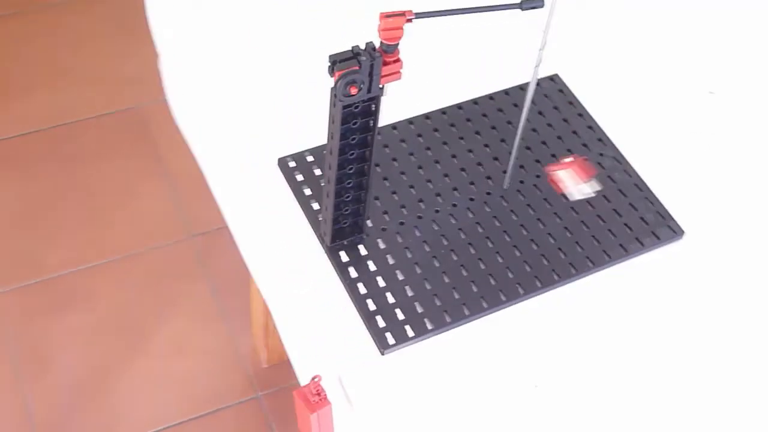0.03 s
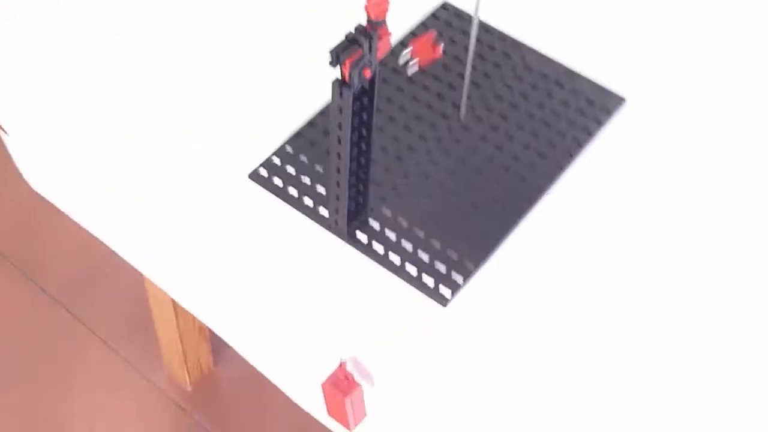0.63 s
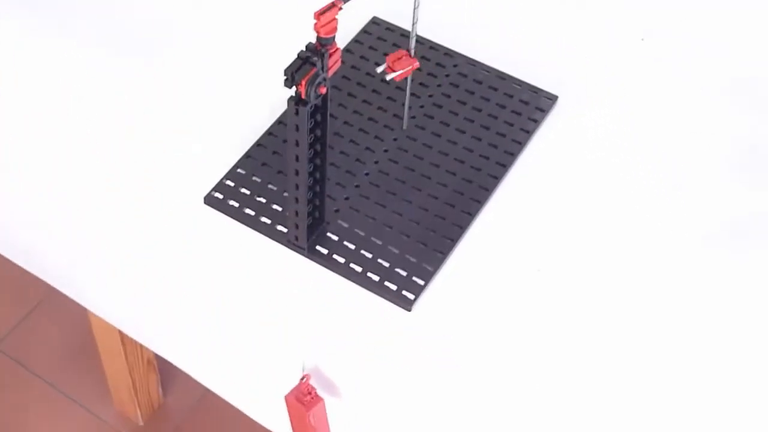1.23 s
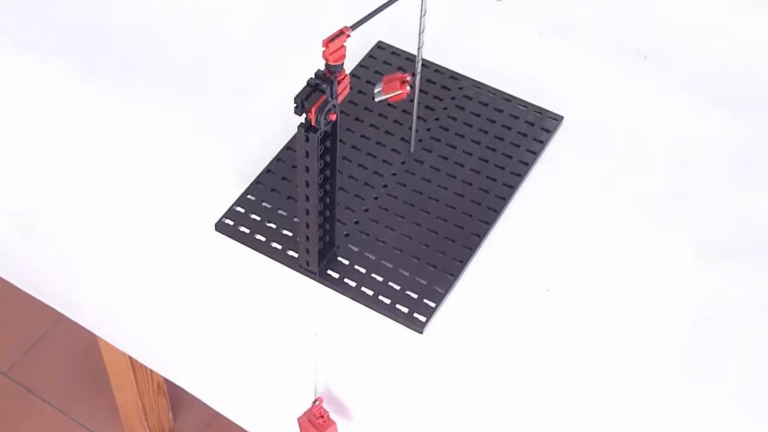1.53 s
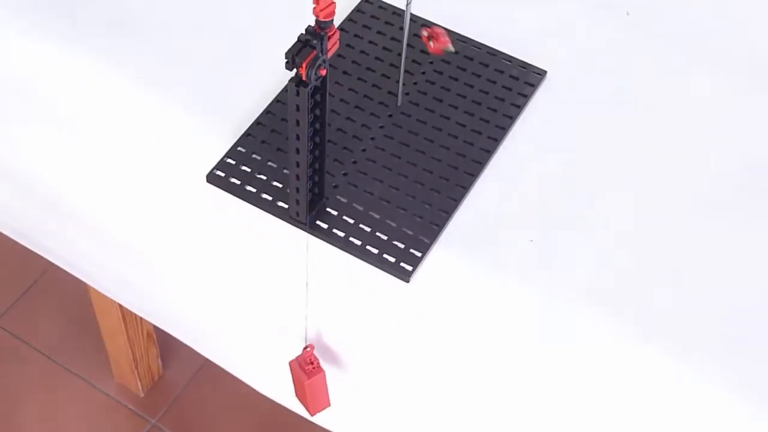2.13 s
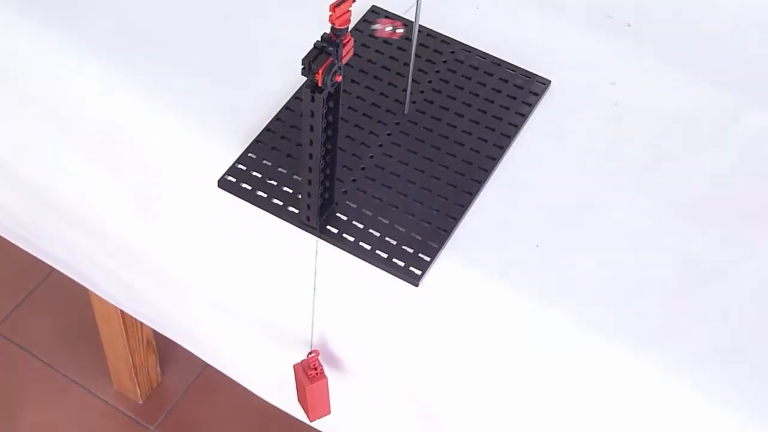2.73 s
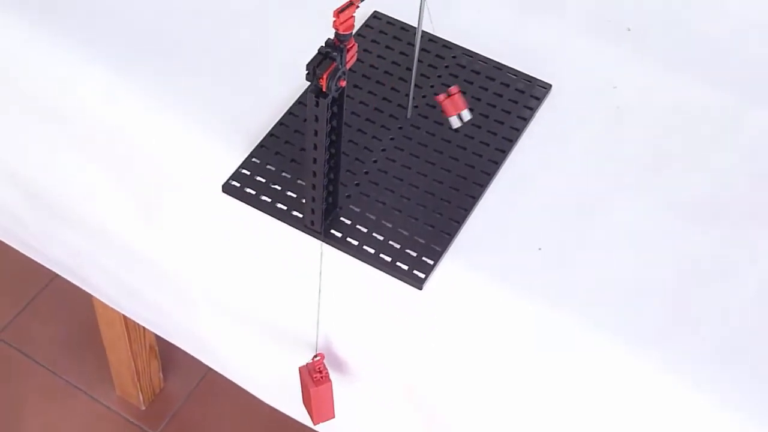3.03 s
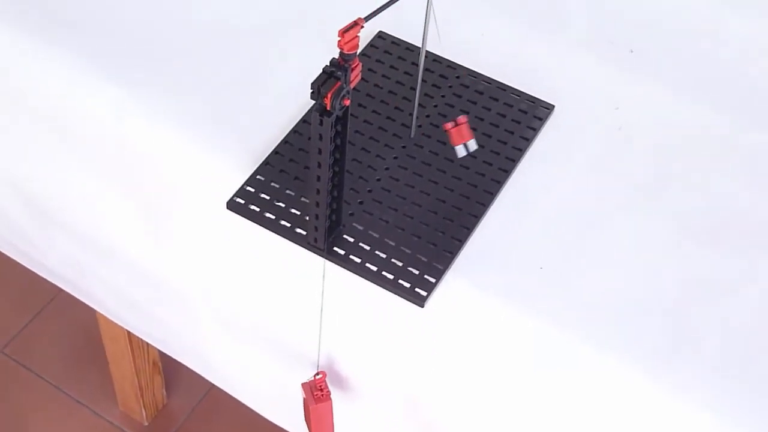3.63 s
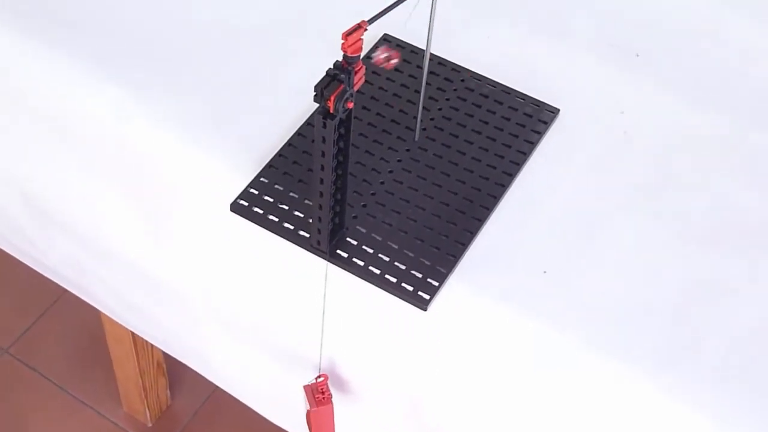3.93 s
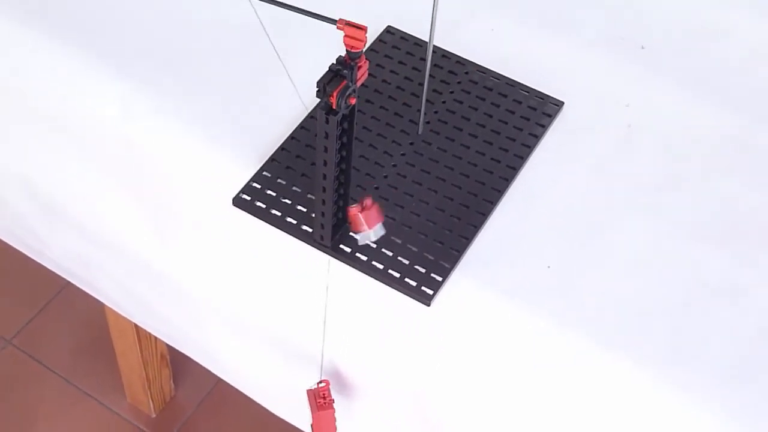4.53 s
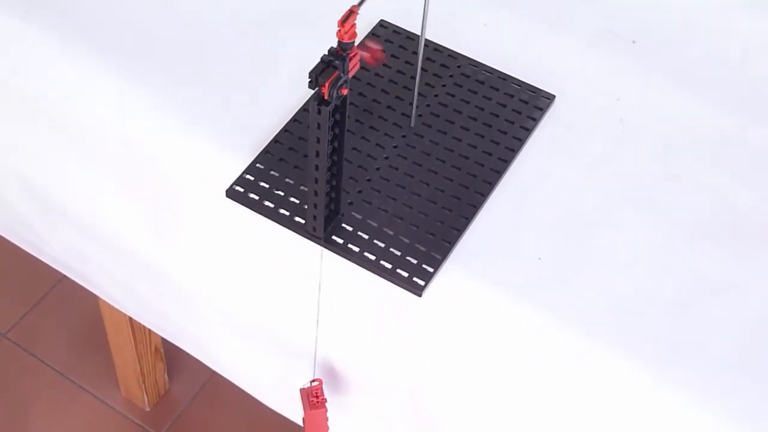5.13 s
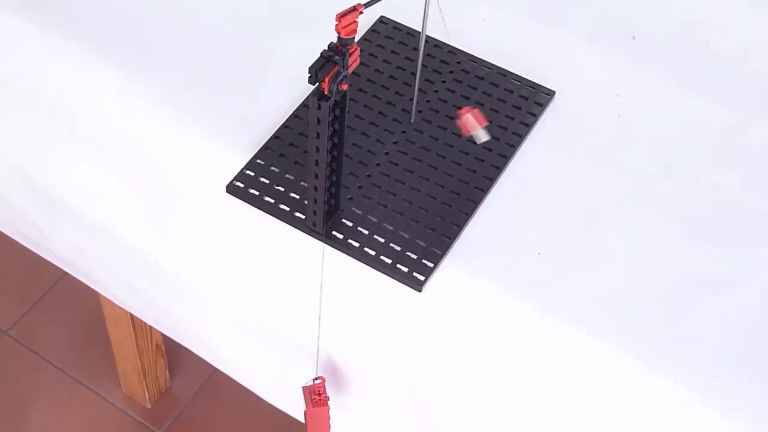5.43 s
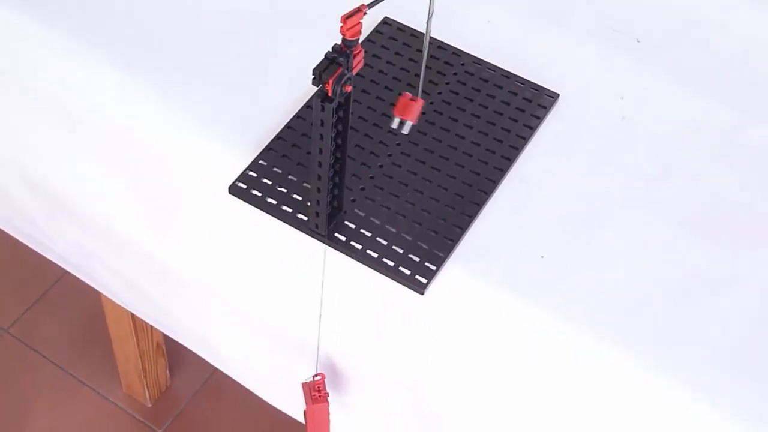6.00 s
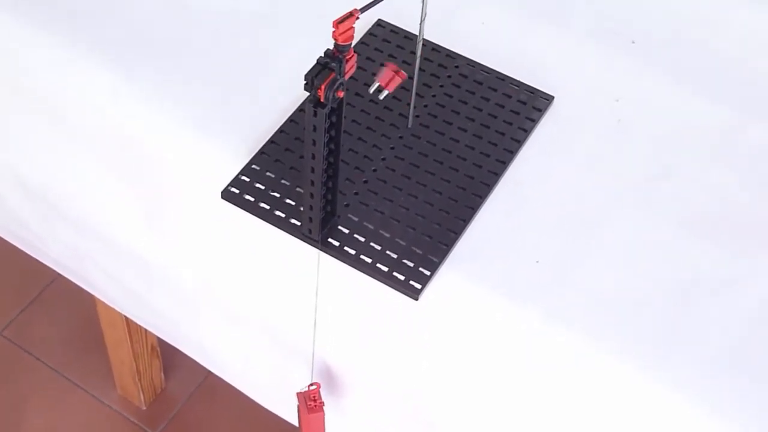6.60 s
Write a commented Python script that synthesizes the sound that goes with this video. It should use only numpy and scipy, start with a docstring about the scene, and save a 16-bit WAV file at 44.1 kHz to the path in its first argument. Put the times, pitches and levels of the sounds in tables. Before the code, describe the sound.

A toy pendulum swings on a thread in a small, hard-floored room. After a dull bump and faint thread swishes, its weight bounces on a thin steel rod with quick, buzzy clinks. A lull follows, then a sharp, rattly clack against the plastic frame, and near the end two clearer ringing strikes on the rod. One microphone picks it all up with steady soft hiss.

```python
"""A small, hard-floored room, with a toy flying pendulum of plastic bricks on a table.
The bob swings round on a thread, bounces on a thin steel rod, which rings, and hits the plastic
frame, whose loose bricks chatter. The thread slides along the rod; the arm's pivot squeaks faintly.
A few dull bumps and a steady hiss lie behind it; one narrow-band microphone hears it all."""
import sys
import numpy as np
from scipy import signal
from scipy.fft import rfft, irfft, next_fast_len
from scipy.io import wavfile
from scipy.ndimage import uniform_filter1d

SR = 44100
rng = np.random.default_rng(int(sys.argv[2]) if len(sys.argv) > 2 else 0)


def master(y):
    """Save y as 16-bit WAV."""
    cut = np.clip(np.atleast_2d(y).T, -1, 1)
    pcm = np.round(cut * 32767)  # scale
    wavfile.write(sys.argv[1], SR, pcm.astype(np.int16))


N = 298116
T = np.arange(SR) / SR  # one second in the life of a sound


def amp(db):
    """Decibels to gain."""
    return 10 ** (np.asarray(db) / 20)


def unit(x):
    """Scale to unit energy."""
    return x / np.sqrt(np.sum(x ** 2))


def add(track, start_s, x):
    """Mix x into the track at start_s."""
    i = int(start_s * SR)
    track[i:i + len(x)] += x[:max(N - i, 0)]


def on_log_axis(hz, points):
    """Interpolate (f/Hz, value) points over log frequency."""
    f, value = np.transpose(points)
    return np.interp(np.log(hz + 1), np.log(f), value)


def colour(x, spectrum, tilt_db_oct=0):
    """Minimum-phase filter with the given spectrum and tilt."""
    n = 2 * next_fast_len(len(x))
    hz = np.arange(n // 2 + 1) * SR / n
    tilted = [(f, db + tilt_db_oct * np.log2(f / spectrum[0][0])) for f, db in spectrum]
    cepstrum = irfft(np.log(amp(on_log_axis(hz, tilted))))
    cepstrum[1:n // 2] *= 2
    cepstrum[n // 2 + 1:] = 0
    return irfft(rfft(x, n) * np.exp(rfft(cepstrum)))[:len(x)]


def burst(envelope, spectrum, tilt_db_oct=0):
    """Dense, damped resonances as enveloped noise; unit energy."""
    return unit(colour(envelope * rng.standard_normal(len(envelope)), spectrum, tilt_db_oct))


def swell(tau_s):
    """Envelope of a soft contact taking up its load; peaks at 2 * tau_s."""
    return T ** 2 * np.exp(-T / tau_s)


def mode(hz, t60_s, swell_cycles, buzz_hz=0):
    """Damped sine with a gradual onset; buzzing contact jolts its phase and widens it by buzz_hz."""
    envelope = (1 - np.exp(-T * hz / swell_cycles)) * amp(-60 * T / t60_s)
    jolts = uniform_filter1d(rng.standard_normal(SR), size=90)
    wander_rad = np.cumsum(jolts) * np.sqrt(2 * np.pi * buzz_hz / SR)
    return envelope * np.sin(2 * np.pi * (hz * T + rng.random()) + wander_rad)


def ring(modes, swell_cycles):
    """Summed modes of a struck body."""
    return sum(amp(db) * mode(hz, t60_s, swell_cycles) for hz, db, t60_s in modes)


# noise floor spectrum: f/Hz, level/dB
HISS_SPECTRUM = [(20, -23.5), (45, -9.5), (95, -7.5), (125, -2), (155, -3), (200, -2), (380, -2.5),
                 (1000, -6), (2200, -10.5), (5000, -15.5), (6100, -18), (7000, -22), (9000, -66)]


def hiss(rms_db=-53):
    """Steady room noise and microphone hiss."""
    return amp(rms_db) * np.sqrt(N) * burst(np.ones(N), HISS_SPECTRUM)


def push(tau_s, hz, edge_ratio=1.3):
    """Soft contact: noise swells and fades in a band round hz; unit energy."""
    noise = swell(tau_s) * rng.standard_normal(SR)
    highpass = signal.butter(5, hz / edge_ratio, "high", fs=SR, output="sos")
    lowpass = signal.butter(3, hz * edge_ratio, fs=SR, output="sos")
    return unit(signal.sosfilt(lowpass, signal.sosfilt(highpass, noise)))


# dull bumps: t/s, level/dB, swell tau/s, centre f/Hz
BUMP_EVENTS = [(.283, -6, .007, 380), (0.357, -17.5, 0.0051, 443), (2.605, -22.5, 0.006, 654),
               (2.845, -27.5, 0.0093, 247), (6.024, -21.5, 0.0086, 345), (6.085, -27, 0.0083, 317)]


def bumps(scuff_lead_s=.04, scuff_db=-5.5, scuff_hz=1120, scuff_stretch=2.6):
    """Dull, soft contacts, each opening with a lighter, higher, slower scuff."""
    out = np.zeros(N)
    for start_s, db, tau_s, hz in BUMP_EVENTS:
        add(out, start_s - scuff_lead_s, amp(db + scuff_db) * push(tau_s * scuff_stretch, scuff_hz))
        add(out, start_s, amp(db) * push(tau_s, hz))
    return out


# thread friction spectrum: f/Hz, level/dB
SLIDE_SPECTRUM = [(60, -36), (300, -12), (1500, -16), (2700, -19), (3650, -2), (4150, -8), (4700, -4),
                  (5450, -1), (6300, -7), (7200, -12)]
# thread slides: t/s, level/dB, swell tau/s, tilt/(dB/oct)
SLIDE_EVENTS = [(.275, -21.5, 0.021, -5), (.535, -22, 0.012, -5), (.60, -24, 0.019, -4),
                (4.413, -13, 0.0061, -2)]


def thread_slides(grain_db=3, slip_samples=50):
    """The thread slides along the rod in tiny slips."""
    out = np.zeros(N)
    for start_s, db, tau_s, tilt_db_oct in SLIDE_EVENTS:
        slips = amp(grain_db * np.repeat(rng.standard_normal(SR // slip_samples), slip_samples))
        add(out, start_s, amp(db) * burst(slips * swell(tau_s), SLIDE_SPECTRUM, tilt_db_oct))
    return out


# pivot squeaks: t/s, level/dB, length/s
SQUEAK_EVENTS = [(1.025, -51.5, 0.036), (1.072, -51, 0.15), (1.14, -53, 0.25), (1.638, -64, 0.25)]


def pivot_squeaks(pitch_hz=2120, waver=0.0031):
    """The pivot sings on one slightly unsteady note."""
    out = np.zeros(N)
    for start_s, db, length_s in SQUEAK_EVENTS:
        n = int(length_s * SR)
        drift = np.interp(np.arange(n), np.linspace(0, n, 8), rng.standard_normal(8))
        phase = 2 * np.pi * np.cumsum(pitch_hz * (1 + waver * drift)) / SR
        add(out, start_s, amp(db) * np.hanning(n) * np.sin(phase))
    return out


# hard contact tick spectrum: f/Hz, level/dB
TICK_SPECTRUM = [(200, -45.5), (950, -17.5), (1400, -2), (2100, -11), (2500, 1), (2950, -5), (3420, 4),
                 (3950, -1), (4600, 4), (5050, -1), (5450, 3.5), (6300, 1.5), (7200, -12)]
# dry frame clack spectrum: f/Hz, level/dB
CLACK_SPECTRUM = [(40, -36), (100, -24), (180, -10), (250, -2), (420, -3.5), (520, -8.5), (860, 4.5),
                  (1300, -4.5), (1900, -4.5), (2600, -11.5), (3200, -16.5), (7000, -28.5)]
# plastic frame modes: f/Hz, level/dB, t60/s
FRAME_RESONANCES = [(236.3, -3.5, 0.61), (262.8, 0, 0.4), (404, 7.5, 0.18), (602.6, 8, 0.2),
                    (768, -8, 0.35), (884, 3.5, 0.1), (1064, 1.5, 0.19), (1633, 0.5, 0.12)]
# tabletop modes: f/Hz, level/dB, t60/s
TABLE_RESONANCES = [(125.7, 1.5, 0.7), (134.6, -1.5, 0.76)]


def contact(tick_db, tick_tau_s, frame_db, boom_db, clack_tau_s=0.0028, press_tau_s=0.00056):
    """A blow ticks and clacks; frame and table ring on. Returns (part sent round the room, near part)."""
    press = 1 - np.exp(-T / press_tau_s)
    tick = amp(tick_db) * burst(press * np.exp(-T / tick_tau_s), TICK_SPECTRUM)
    clack = amp(frame_db) * burst(np.exp(-T / clack_tau_s), CLACK_SPECTRUM)
    frame_ring = amp(frame_db - 35) * ring(FRAME_RESONANCES, swell_cycles=2.8)
    table_boom = amp(boom_db) * ring(TABLE_RESONANCES, swell_cycles=2.4)
    return np.array([tick + clack, frame_ring + table_boom])


# rod bending modes, in order: f/Hz, level/dB, t60/s, split between planes/Hz
ROD_BENDING = [(223, -38.5, 0.4, 3), (667, -38.7, 0.85, 1), (1396, -31.5, 0.16, 61),
               (2324, -35.3, 0.16, -130), (3620, -41.5, 0.15, -150), (4680, -45, 0.1, 76),
               (6000, -69, 0.11, 100)]


def rod_ring(tilt_db_oct, place, grip, second_plane_db=-13, radiate_hz=1400, buzz=2.7, damping=2.05):
    """The steel rod bends in two planes. Returns (part sent round the room, near part)."""
    far, near = 0, 0
    for order, (hz, db, t60_s, split_hz) in enumerate(ROD_BENDING, 1):
        gain = amp(db + tilt_db_oct * np.log2(hz / ROD_BENDING[1][0]))
        coupling = np.sin(order * np.pi * place)  # weak when struck near a node
        # thread wound round the rod damps it and makes it buzz
        damped_t60_s = t60_s / (1 + damping * grip * np.sqrt(t60_s))
        buzz_hz = buzz * grip * np.sqrt(hz)
        first, second = (mode(f, damped_t60_s, swell_cycles=5.8, buzz_hz=buzz_hz)
                         for f in (hz, hz + split_hz))
        pair = gain * coupling * (first + amp(second_plane_db) * second)
        radiated = 1 - np.exp(-(hz / radiate_hz) ** 3)  # a thin rod radiates its high modes best
        far += radiated * pair
        near += (1 - radiated) * pair
    return np.array([far, near])


# bob on rod: t/s, tick level/dB, ring level/dB, frame level/dB, place along rod/0-1, thread grip/0-1
ROD_STRIKES = [(1.134, -8.5, -1, -24.5, .322, 0.8), (1.224, -24.5, -3.5, -27, .335, 0.74),
               (1.44, -35, -15, -32.5, 0.29, 0.69), (6.485, -2.5, -3.5, -21, 0.28, .05),
               (6.682, -13.5, -2, -23.5, 0.22, .1)]
# contacts within one strike: delay/s
CONTACT_DELAYS_S = [0, .011, .040]


def rod_blows(tick_step_db=-6, ring_step_db=0.5, tick_tau_s=.006, choke_tau_s=.012):
    """The bob bounces on the rod; its next strike chokes the ring. Yields (t/s, sound) per contact."""
    returns_s = [strike[0] for strike in ROD_STRIKES[1:]] + [np.inf]
    for (start_s, first_tick_db, ring_db, frame_db, place, grip), return_s in zip(ROD_STRIKES, returns_s):
        # each contact is softer, while the rod takes up more of the swing
        for k, delay_s in enumerate(CONTACT_DELAYS_S):
            contact_s = start_s + delay_s
            tick_db = first_tick_db + tick_step_db * k
            tilt_db_oct = -1.24 + 11.5 * grip + 0.2734 * tick_db  # grip and hardness brighten the ring
            choke = np.exp(-np.maximum(contact_s + T - return_s, 0) / choke_tau_s)
            steel = amp(ring_db + ring_step_db * k) * choke * rod_ring(tilt_db_oct, place, grip)
            knock = contact(tick_db, tick_tau_s, frame_db, boom_db=ring_db - 53)
            yield contact_s, steel + knock


# bob on frame: t/s, tick level/dB, rattle level/dB
FRAME_STRIKES = [(4.261, -5.5, -8.2), (4.413, -41, -21)]


def frame_blows(knocks=7, gap_s=.0044, peak_s=0.013, slope_db_per_s=648, tick_tau_s=.0033):
    """The bob hits the frame; loose bricks chatter up to a peak and die away. Yields (t/s, sound)."""
    for start_s, first_tick_db, rattle_db in FRAME_STRIKES:
        for k in range(knocks):
            delay_s = k * gap_s
            knock_db = rattle_db - slope_db_per_s * abs(delay_s - peak_s)
            tick_db = knock_db - 19 if k else first_tick_db
            yield start_s + delay_s, contact(tick_db, tick_tau_s, knock_db, boom_db=knock_db - 45.5)


# room decay: f/Hz, t60/s
ROOM_DECAY = [(120, 0.48), (260, 0.54), (700, 0.6), (1840, 0.45), (4850, 0.33), (7500, 0.3)]


def echoes(gap_s=0.0036, build_s=0.0025, sparse_s=0.022):
    """Separate echoes off the near walls thicken into a tail whose treble dies first."""
    t = np.maximum(T - gap_s, 0)
    density = np.clip(0.051 + (t / sparse_s) ** 2, 0, 1)
    arrivals = rng.standard_normal(SR) * (rng.random(SR) < density) / np.sqrt(density)
    spectrum = rfft(arrivals)
    hz = np.arange(len(spectrum))
    tail = 0
    for centre_hz, t60_s in ROOM_DECAY:
        band = on_log_axis(hz, [(f, f == centre_hz) for f, _ in ROOM_DECAY])
        tail += irfft(spectrum * band) * amp(-60 * t / t60_s)
    return unit(tail * (1 - np.exp(-t / build_s)))


def room(x, wet_db=-1.5):
    """The hand-held microphone drifts, so each second meets its own pattern of echoes."""
    out = np.zeros(N)
    for i in range(0, N, SR):
        add(out, i / SR, signal.fftconvolve(x[i:i + SR], echoes()))
    return amp(wet_db) * out


def scene():
    """The toy, its room and the hiss, the same in both ears."""
    far, near = np.zeros(N), np.zeros(N)
    for start_s, (far_part, near_part) in [*rod_blows(), *frame_blows()]:
        add(far, start_s, far_part)
        add(near, start_s, near_part)
    far += bumps() + thread_slides()
    mono = far + room(far) + near + pivot_squeaks() + hiss()
    return np.array([mono, mono])


def record(dry, rolloff_hz=6900, cutoff_hz=7500):
    """The microphone's top rolls off, then is cut steeply."""
    rolloff = signal.butter(8, rolloff_hz, fs=SR, output="sos")
    cutoff = signal.ellip(10, .2, 70, cutoff_hz, fs=SR, output="sos")
    return signal.sosfilt(cutoff, signal.sosfilt(rolloff, dry))


dry = scene()
out = record(dry)
master(out)
```